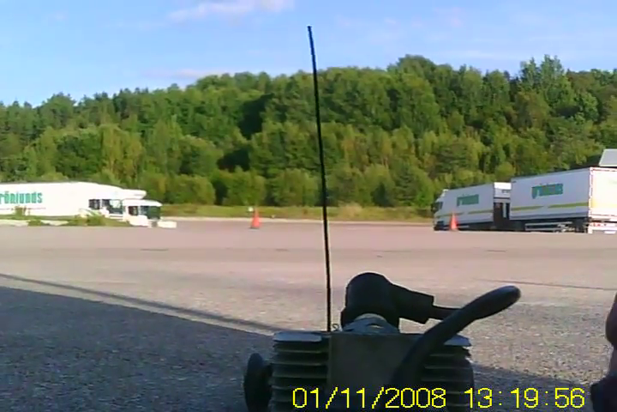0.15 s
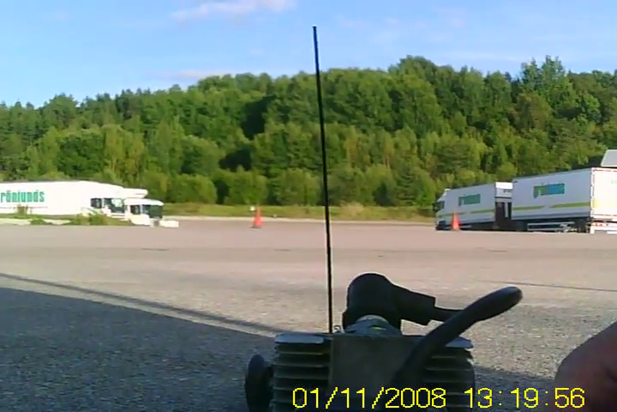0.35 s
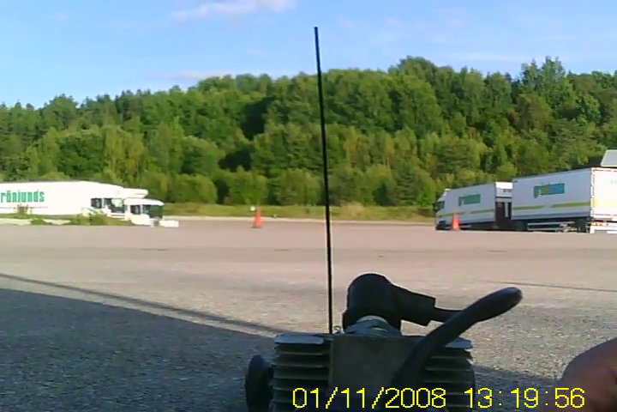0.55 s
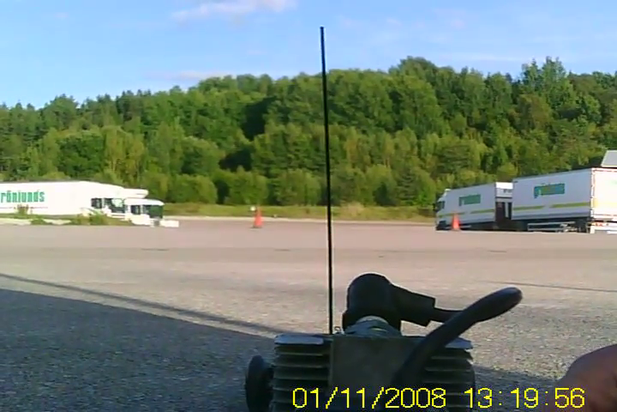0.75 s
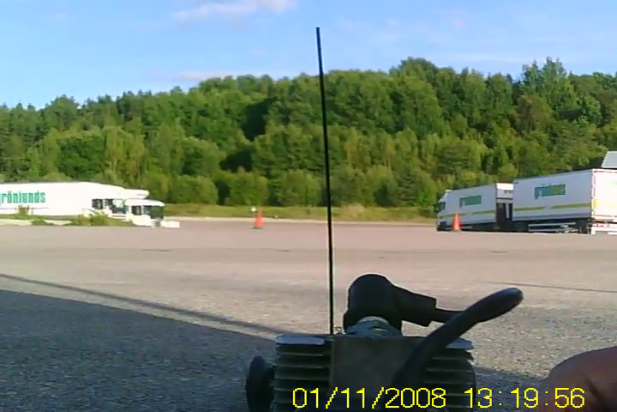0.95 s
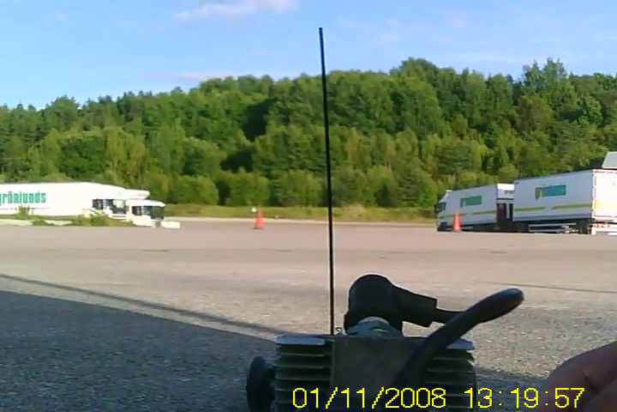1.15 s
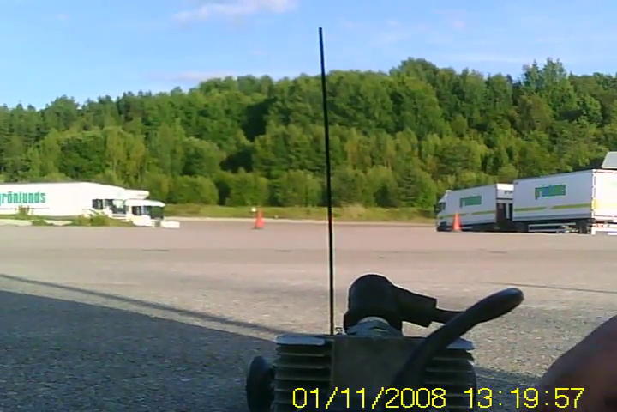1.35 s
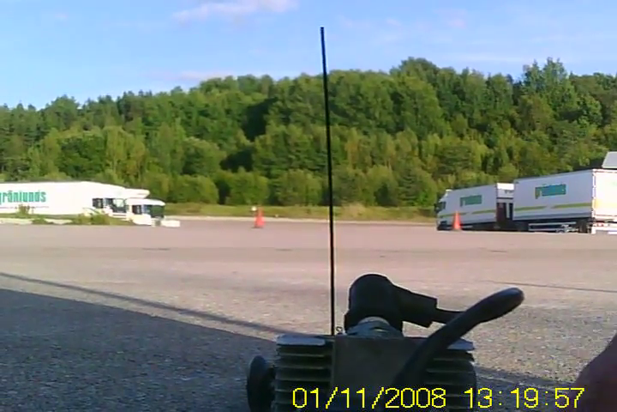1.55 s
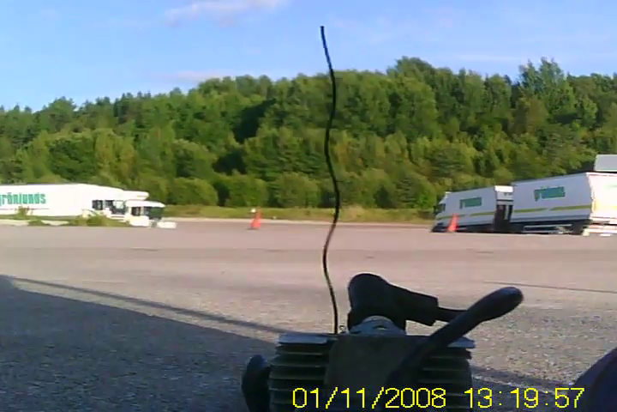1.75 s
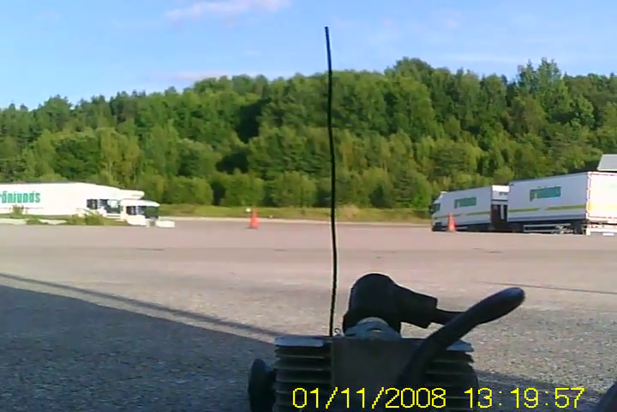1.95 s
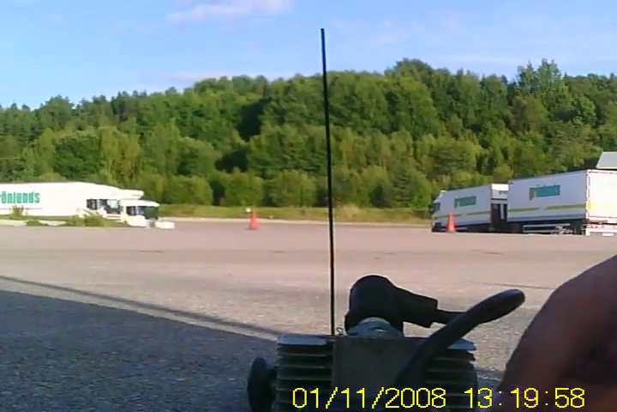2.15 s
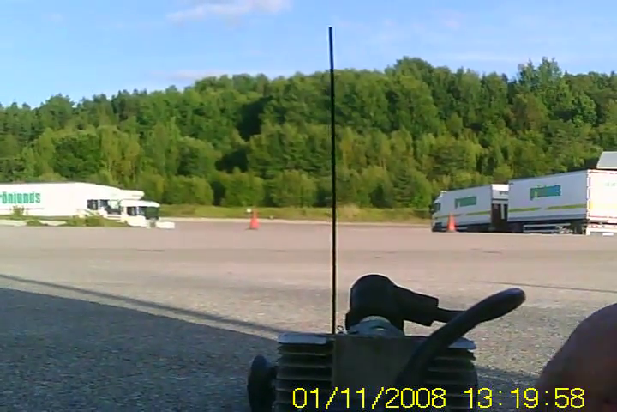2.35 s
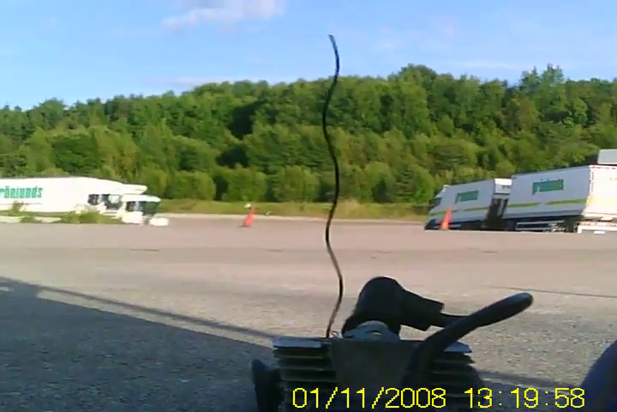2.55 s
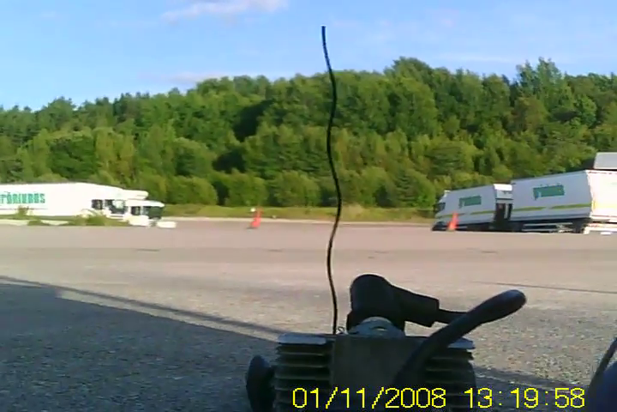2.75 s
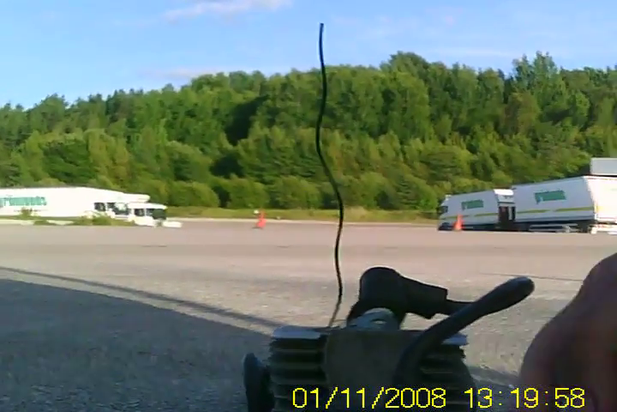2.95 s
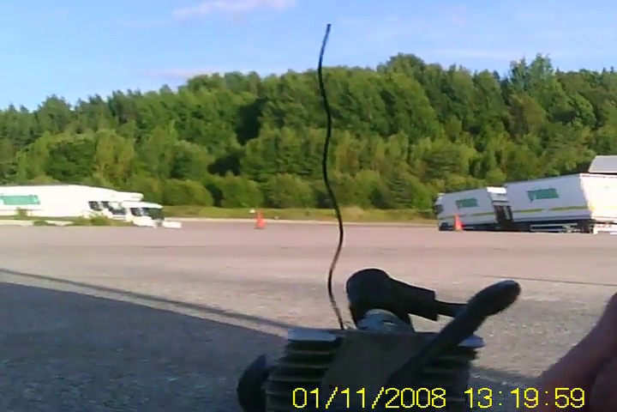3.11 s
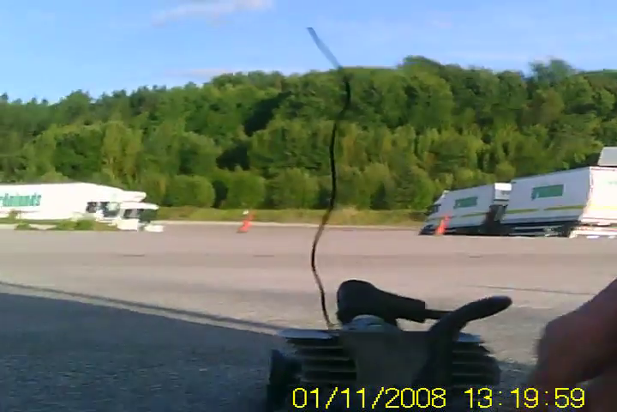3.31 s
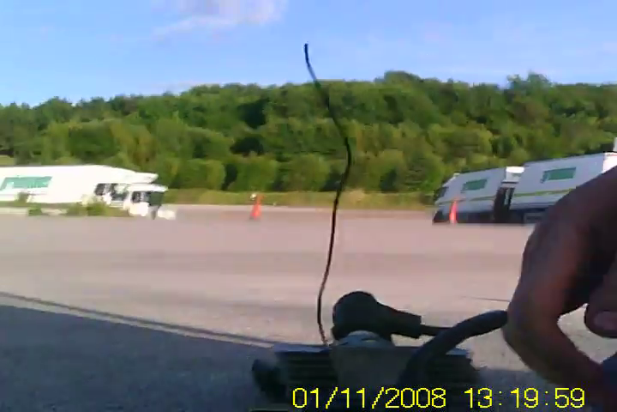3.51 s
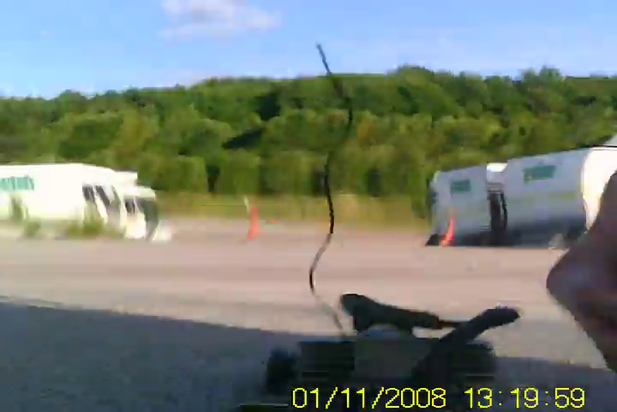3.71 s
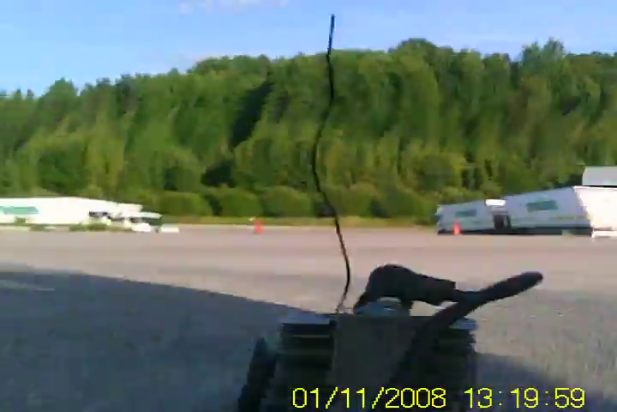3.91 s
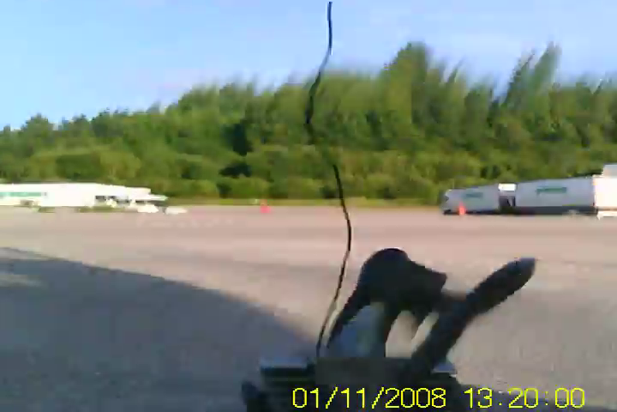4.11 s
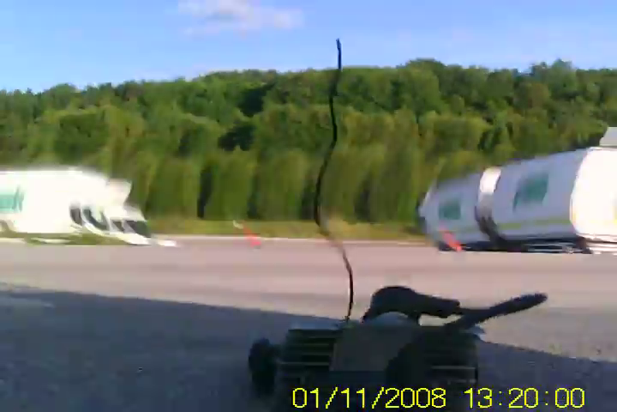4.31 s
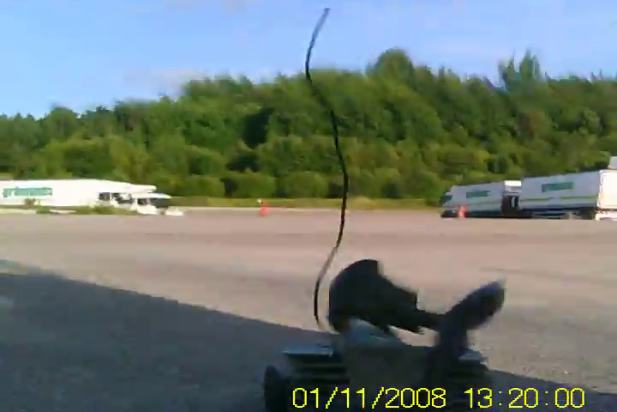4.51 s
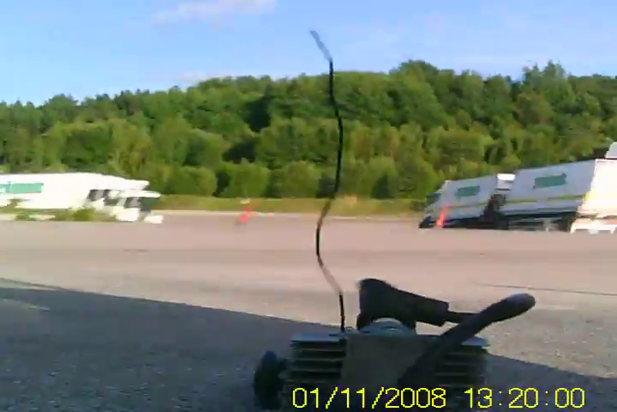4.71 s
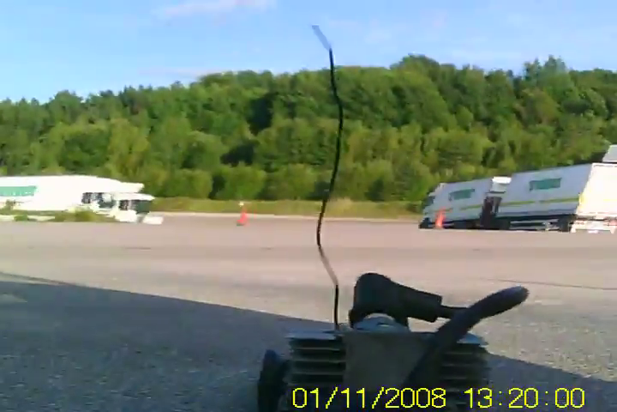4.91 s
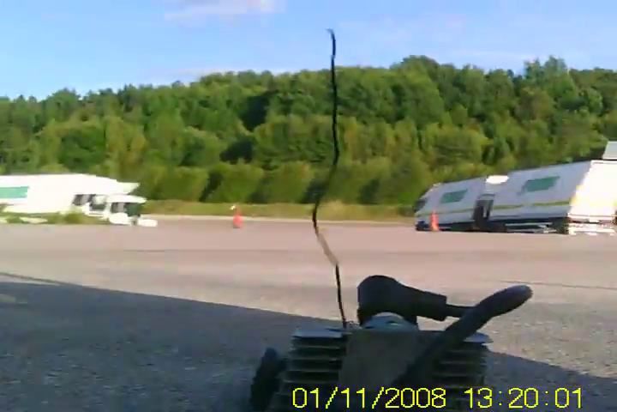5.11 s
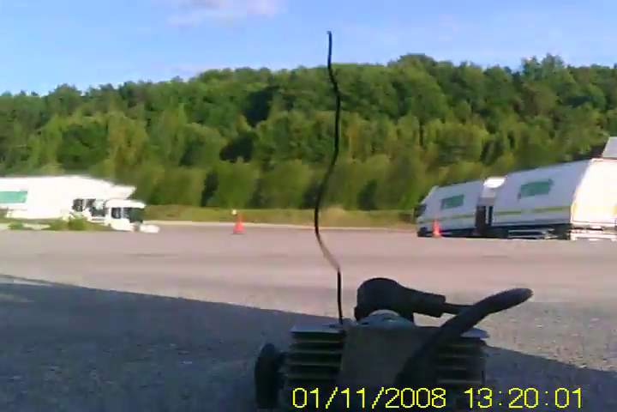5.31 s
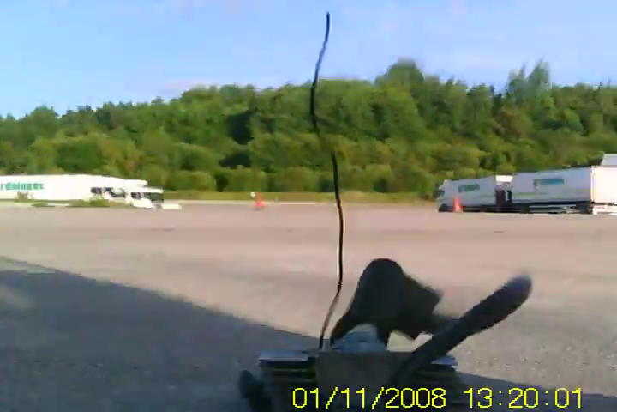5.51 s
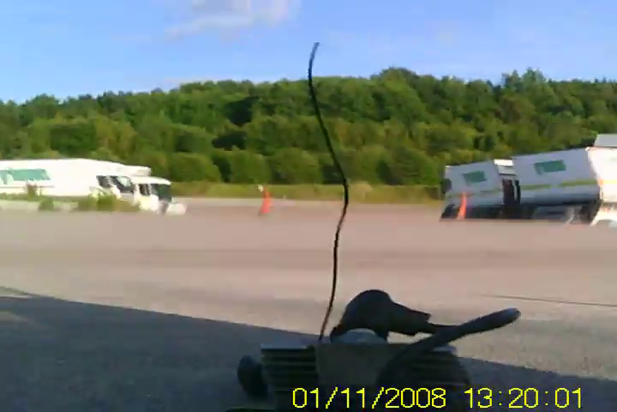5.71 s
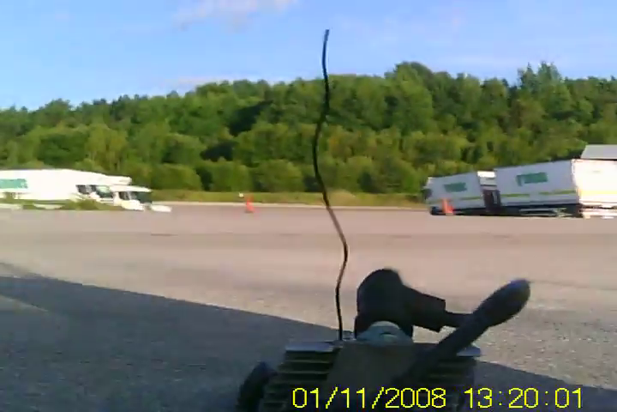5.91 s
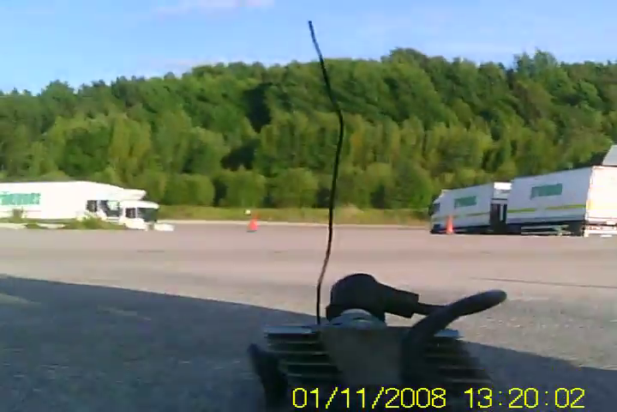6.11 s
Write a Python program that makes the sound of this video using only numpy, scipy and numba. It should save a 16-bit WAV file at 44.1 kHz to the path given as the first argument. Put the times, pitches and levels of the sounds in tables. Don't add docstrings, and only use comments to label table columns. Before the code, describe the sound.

Close beside a cheap overloaded microphone, a little model engine is pull-started outdoors, coughs into life and sputters on with metallic ticking.

```python
import sys
import numpy as np
from scipy import signal
from scipy.fft import rfft, irfft
from scipy.io import wavfile
from scipy.ndimage import uniform_filter1d
from numba import njit

SR = 44100
rng = np.random.default_rng(int(sys.argv[2]) if len(sys.argv) > 2 else 0)


def put_to_file(sound):
    columns = np.atleast_2d(sound).T
    safe = np.clip(columns, -1, 1)
    whole_steps = np.round(safe * 32767)
    wavfile.write(sys.argv[1], SR, whole_steps.astype(np.int16))


def voltage_ratio(level):
    return 10 ** (np.asarray(level, float) / 20)


N = 276066


@njit
def svf(x, hz, width):
    y, b, l = np.empty(len(x)), 0., 0.
    for i in range(len(x)):
        g, k = np.tan(np.pi * hz[i] / SR), width / hz[i]
        v = (b + g * (x[i] + 1e-18 - l)) / (1 + g * (g + k))
        b, l, y[i] = 2 * v - b, l + 2 * g * v, k * v
    return y


def band(x, hz, width):
    return svf(x, np.full(len(x), 1. * hz), 1. * width)


def body(x, modes, stretch=0.96):
    total = np.zeros(N)
    for hz, width, db in modes:
        click_gain = SR / 2 / np.pi / width
        total += voltage_ratio(db) * click_gain * svf(x, hz * stretch * np.ones(N), 1. * width)
    return total


def follow(table, s):
    return np.interp(s, *np.transpose(table))


def unit(x):
    return x / np.sqrt(np.mean(x ** 2))


def add(track, s, shape):
    part = track[int(s * SR):int(s * SR) + len(shape)]
    part += shape[:len(part)]


def push(length_s):
    shape = np.hanning(int(length_s * SR) + 3)
    return shape / shape.sum()


def burst(length_s, rise_s):
    t = np.arange(int(.12 * SR)) / SR
    fade = np.exp(-(t / max(length_s, .002)) ** 1.4)
    return rng.standard_normal(len(t)) * (1 - np.exp(-t / rise_s)) * fade


def stirred(ring, modes, pitch, gas_db):
    dull = signal.lfilter(*signal.butter(2, 1100., fs=SR), rng.standard_normal(N))
    loudness = uniform_filter1d(np.abs(ring), 1500)
    return ring + voltage_ratio(gas_db) * unit(body(dull, modes, pitch)) * loudness


def shaft(speed):
    t = np.arange(speed[0][0], speed[-1][0], 1 / SR)
    angle = np.cumsum(follow(speed, t)) / SR
    return np.interp(np.arange(int(angle[-1]) + 1), angle, t)


# (time [s], speed [turns/s])
PULLS = [
    [(.0558, 14), (.24, 8.5)],
    [(1.5982, 36.5), (1.64, 33.65), (1.7, 38.17), (1.78, 29.56), (1.86, 19.4), (1.96, 13.21), (2.17, 7.68)],
    [(2.4425, 27.88), (2.49, 40.39), (2.56, 37.4), (2.66, 28.18), (2.8, 26.75), (2.93, 31.31), (3.0, 35.32),
     (3.1, 37.46), (3.33, 52.13)],
]
FIRST_PUFF_DB = [-12.5, -14.5, -2.5]
# (time [s], peak level [dB], shove level [dB])
CATCH = [(2.6694, -16, -22), (2.744, -12, -17), (2.8553, -9.5, -31), (2.9547, -8.5, -34.5),
         (3.0395, -24, -50), (3.0676, -8, -57), (3.1445, -11.5, -28), (3.2127, -12, -13.5),
         (3.278, -12.5, -14.5), (3.3415, -12, -7.5), (3.3436, -15, -15), (3.3512, -17, -43)]


def puffs():
    puff_db, fast_turn_s, slow_db_per_s = -3, 0.0237, -340
    spent_db = -3.5
    rows, caught = [], np.transpose(CATCH)[0]
    for pull, first_db in zip(PULLS, FIRST_PUFF_DB):
        s = shaft(pull)
        gap = np.diff(s, prepend=s[0])
        db = puff_db + slow_db_per_s * np.maximum(gap - fast_turn_s, 0)
        db[0] = first_db
        since_firing = s - np.append(-N, caught)[np.searchsorted(caught, s)]
        after_catch_db = puff_db + spent_db * (since_firing > 1.5 * gap)
        db = np.where(s < caught[0], db, after_catch_db)
        unfired = np.abs(s[:, None] - caught).min(axis=1) > .012
        rows += list(zip(s[unfired], db[unfired]))
    return rows


IDLE_FROM_S = 3.37
# (time [s], speed [turns/s])
RUNNING = [(3.1576, 46.37), (3.3, 45.55), (3.5, 50.43), (3.8, 52.06), (4.0, 50.79), (4.2, 53.08),
           (4.6, 55.19), (5.0, 55.32), (5.15, 56.04), (5.35, 52.72), (5.6, 50.53), (5.85, 48.49),
           (6.05, 46.96), (6.26, 49.23)]
RHYTHM = [(5, 3), (1, 3), (5, 2), (5, 3), (2, 2), (1, 3), (2, 2), (1, 3), (3, 3), (2, 3), (7, 3), (4, 2),
          (8, 2), (2, 3), (2, 2), (1, 2), (3, 2), (2, 3), (2, 2), (2, 3)]
# (first peak level [dB], last peak level [dB], shove level [dB])
STRENGTH = [(-6, -10.5, -17), (-8, 3, -4.5), (-10, -18, -32), (-10, -5.5, -19.5), (-10, -13.5, -18.5),
            (-7, 0, -27), (-15, -14, -25), (-8.5, -4.5, -40), (-8.5, -7.5, -17), (-8.5, -13.5, -19),
            (-5, -8, -20.5), (-12.5, -9, -34), (-16, -6.5, -36), (-7, -3.5, -24), (-10.5, -10.5, -34),
            (-6, -8, -34), (-12.5, -7.5, -50), (-6, -5.5, -45), (-7, -17, -34), (-10, -10.5, -40)]


def turns():
    lag_s, lag_s_per_hz, lag_at_hz = .0015, .00078, 55.3
    shove_per_db, scatter_db = 1.5, 1.45
    tick_s = shaft(RUNNING)
    jitter_s = .0002 * rng.standard_normal(len(tick_s))
    port_s = tick_s + jitter_s + lag_s + lag_s_per_hz * (lag_at_hz - follow(RUNNING, tick_s))
    fired, turn = [], 11
    for (count, wait), (first_db, last_db, shove_db) in zip(RHYTHM, STRENGTH):
        middle_db = (first_db + last_db) / 2
        for db in np.linspace(first_db, last_db, count) + scatter_db * rng.standard_normal(count):
            fired.append((port_s[turn], db, shove_db + shove_per_db * (db - middle_db)))
            turn += wait
    return tick_s, port_s[tick_s > IDLE_FROM_S], fired


# (time [s], level [dB])
WHIRR_IDLE = [(3.37, -30.5), (4.5, -24.5), (5.3, -28), (5.6, -37), (6.26, -37.5)]
# (time [s], whirr level [dB], shake level [dB], width [s])
STRAINS = [
    (0.0, -22, -24, 0.011),
    (1.6, -45, -32.5, 0.11),
    (1.74, -34, -59, .03),
    (2.37, -72, -43, 0.04),
    (2.541, -12.5, -50, 0.044),
    (2.96, -25, -45, 0.1),
]


def stir():
    t = np.arange(N) / SR
    speed = sum(np.interp(t, *np.transpose(pull), 0, 0) for pull in PULLS) / 40
    speed = uniform_filter1d(speed, size=2000)
    idle = uniform_filter1d(1. * (t > IDLE_FROM_S), size=2000)
    whirr = voltage_ratio(-48.5) + voltage_ratio(-35.5) * np.abs(speed) ** 1.06 + idle * voltage_ratio(follow(WHIRR_IDLE, t))
    shake = voltage_ratio(-43) + idle * voltage_ratio(-45)
    for s, whirr_db, shake_db, width in STRAINS:
        bell = np.exp(-((t - s) / width) ** 2)
        whirr = whirr + voltage_ratio(whirr_db) * bell
        shake = shake + voltage_ratio(shake_db) * bell
    return whirr, shake


# (frequency [Hz], width [Hz], level [dB])
WHIRR = [(1930, 220, 0), (2650, 400, -6), (3800, 500, -6), (6450, 850, -1), (8300, 1500, -15)]
# (frequency [Hz], level per Hz [dB])
AIR = [(25, -64), (76, -52), (165, -5), (323, -17.5), (2200, -26), (5120, -40), (12000, -71), (16000, -95)]
# (frequency [Hz], rms level [dB])
WHINES = [(2896, -79), (3892, -78), (5599, -81), (7402, -83)]


def background(port_s):
    whirr_gain, shake_gain = stir()
    gate = np.ones(N)
    for s in port_s:
        add(gate, s, 8.0 * np.exp(-np.arange(800) / SR / 0.0025))
    whirr = gate * unit(body(rng.standard_normal(N), WHIRR)) * whirr_gain * voltage_ratio(-16.5)
    deep = band(band(rng.standard_normal(N), 42, 60), 42, 60)
    shake = unit(deep) * shake_gain * voltage_ratio(-8.5)
    hz, db = np.transpose(AIR)
    bins_hz = np.arange(1, N // 2 + 2) * SR / N
    colour = voltage_ratio(np.interp(np.log(bins_hz), np.log(hz), db))
    air = unit(irfft(rfft(rng.standard_normal(N)) * colour, N)) * voltage_ratio(-57.5)
    whines = sum(voltage_ratio(db) * unit(band(rng.standard_normal(N), hz, 25)) for hz, db in WHINES)
    return whirr + shake + whines + air


# (time [s], peak level [dB], centre [Hz], rattle length [s])
RATTLES = [(0.0024, -36, 2370, 0.022), (0.037, -32, 2150, 0.013), (0.1624, -30, 3770, 0.0053),
           (0.171, -40, 1750, 0.011), (0.296, -45, 1710, 0.012), (0.299, -46, 700, 0.016),
           (2.367, -27, 700, 0.019), (0.369, -51, 1900, 0.013), (0.6997, -33, 3130, 0.012),
           (0.8868, -26.5, 2770, 0.013), (1.288, -44, 3000, 0.021), (1.532, -42, 1930, 0.011),
           (1.564, -9.5, 2550, 0.014), (1.566, -18, 1100, 0.012), (2.145, -52, 2360, 0.012),
           (2.191, -47, 1980, 0.0065), (2.282, -49, 3000, .015), (2.358, -50, 1730, 0.031),
           (2.381, -13.5, 1815, 0.016)]
# (time [s], peak level [dB], length [s])
LEAKS = [(1.852, -20, .008), (1.874, -21, .01), (2.422, -18, .01), (2.447, -16, .008), (2.753, -12, .008),
         (2.8245, -15, .008), (2.844, -14, .008), (2.868, -8, .008), (2.89, -16, .008), (2.911, -17, .008),
         (2.933, -12, .01), (2.972, -7, .008), (2.995, -11, .012), (3.254, -13, .008), (3.296, -12, .008),
         (3.318, -13, .008)]
# (frequency [Hz], width [Hz], level [dB])
FRAME = [(2050, 160, -1), (2750, 90, -5), (3150, 170, 0), (3900, 200, -3), (6150, 420, 3)]


def starter():
    knocks, leak, frame = np.zeros((3, N))
    for s, db, hz, length in RATTLES:
        rattle = burst(length, .001)
        rattle[:3] += 1.5
        add(frame, s, voltage_ratio(db) * rattle)
        add(knocks, s, voltage_ratio(db) * 2.4 * band(band(rattle, hz, 1500), hz, 1500))
    for s, db, length in LEAKS:
        add(leak, s, voltage_ratio(db) * burst(length, 0.000072))
    hiss = body(leak, [(6150, 880, 9.5), (7950, 20000, -13)])
    return knocks + voltage_ratio(-25) * body(frame, FRAME) + voltage_ratio(-24.0) * hiss


# (time [s], tick peak level [dB])
LOOSE = [(3.158, -4), (3.2, 0.5), (3.245, 2.5), (3.335, 4.5), (3.375, -1.2), (3.67, -7), (3.85, -6.5),
         (3.965, -20), (4.14, -3), (4.25, -6.5), (4.385, -22.5), (4.48, -2.5), (4.6, -6), (5.0, -10.5),
         (5.45, -12), (5.56, -14.5), (5.84, -0.5), (6.26, -4.5)]
# (from [s], to [s], first peak level [dB], last peak level [dB])
SPELLS = [
    (1.644, 1.815, 1, -16),
    (2.457, 2.589, -1, 1.8),
    (2.627, 2.79, -11, -10),
]
# (time [s], peak level [dB])
STRAY_TICKS = [(1.728, -3), (2.595, -6), (3.0036, -3.5), (3.0509, -9), (3.1213, -14)]
# (frequency [Hz], width [Hz], level [dB])
METAL = [(2540, 450, 1.5), (3780, 550, -5), (4750, 500, -15), (6420, 800, -1), (8600, 1300, -18)]


def ticks(tick_s):
    rows = list(STRAY_TICKS)
    for start, end, first_db, last_db in SPELLS:
        for s, _ in puffs():
            if start < s < end:
                rows.append((s + 0.0071, np.interp(s, [start, end], [first_db, last_db])))
    rows += [(s + .0013, follow(LOOSE, s)) for s in tick_s]
    hits = np.zeros(N)
    for s, db in rows:
        scatter, second = rng.standard_normal(2)
        size = voltage_ratio(db - 6.5 + 1.8 * scatter)
        add(hits, s, -size * push(.00004))
        add(hits, s + .00045 + .000015 * second, .9 * size * push(.00004))
        add(hits, s, voltage_ratio(-32) * size * burst(.0035, .0008))
    ring = signal.sosfilt(signal.butter(2, 8200., fs=SR, output="sos"), body(hits, METAL))
    return ring - band(ring, 700, 800)


# (time [s], level [dB])
HARD_PUFFS = [
    (.004, -27),
    (1.626, -3),
    (1.6555, -4),
]
# (time [s], pitch factor [1])
COLD_PITCH = [(0, 1.08), (2.4, 1.058), (2.9, 1.11), (3.4, 1.07), (6.26, 0.33)]
# (frequency [Hz], width [Hz], level [dB])
COLD_PIPE = [(196.7, 54, 2.5), (228.6, 5.9, -11.5), (442.2, 25.4, -3.5), (666, 41, -8), (880.3, 23.7, -9),
             (1168, 27, -18)]


def pulled():
    ring_share, thump_share = 0.9, 1.25
    drive, direct, gusts, case = np.zeros((4, N))
    for s, db in puffs() + HARD_PUFFS:
        length = 0.0012 * voltage_ratio(-.2 * (db + 4.5))
        slow = voltage_ratio(-.5 * min(db + 3, 0))
        add(drive, s - 0.24 * length, -voltage_ratio(ring_share * db - 8.0) * push(0.39 * length * slow))
        add(case, s - 0.42 * length, -voltage_ratio(db - 17.5) * (slow - 1) * push(length))
        rush_in = np.hanning(int(length * SR)) ** .5
        throw_out = np.hanning(int(1.6 * length * SR)) ** .4
        add(direct, s - .55 * length, -voltage_ratio(thump_share * db - 1.8) * rush_in)
        add(direct, s + .35 * length, voltage_ratio(thump_share * db - 4.8) * throw_out)
        add(gusts, s, voltage_ratio(db) * burst(0.027, 0.00015))
    for s, db, _ in CATCH:
        add(drive, s + .002, voltage_ratio(db + 4.0) * push(0.00043))
    slow_noise = uniform_filter1d(uniform_filter1d(rng.standard_normal(N), size=500), size=500)
    pitch = follow(COLD_PITCH, np.arange(N) / SR) * (1 + .025 * unit(slow_noise))
    pipe = stirred(body(drive, COLD_PIPE, pitch), COLD_PIPE[1:], pitch, -4.5)
    return pipe + direct + body(case, [(175, 23, 10)]) + voltage_ratio(-40.0) * body(gusts, WHIRR)


# (time [s], level [dB])
IDLE_PUFF = [(3.4, -20.5), (4.3, -18.5), (5.1, -19), (6.2, -17)]
# (frequency [Hz], width [Hz], level [dB])
PIPE = [(250, 98, 4.5), (427.6, 40, -10.5), (526, 81, 2), (825, 82, -4.5), (1003, 112, 3.5),
        (1350, 990, -84)]


def exhaust(port_s, fired):
    drive = np.zeros(N)
    for s, turn in zip(port_s, np.gradient(port_s)):
        size = voltage_ratio(follow(IDLE_PUFF, s) + 2.2 * rng.standard_normal())
        add(drive, s + 0.0014, -size * push(0.0013))
        add(drive, s + 0.321 * turn, voltage_ratio(-18.5) * size * push(0.00033))
        add(drive, s + 0.71 * turn, -voltage_ratio(-8.0) * size * push(0.001))
    for s, db, _ in fired:
        add(drive, s + 0.001105, voltage_ratio(db - 8.0) * push(0.0008))
    return stirred(body(drive, PIPE), PIPE, 1., -12)


# (time [s], level [dB])
CRACK = [(3.4, 0.4), (5.1, -0.8), (5.75, -6), (6.26, -6)]
# (frequency [Hz], width [Hz], level [dB])
MOUTH = [(2148, 686, 5.5), (1242, 140, -0.5), (580, 130, -25)]
# (frequency [Hz], width [Hz], level [dB])
HISS = [(3800, 700, -4), (6250, 800, 0), (8500, 1500, -3)]


def firings(fired):
    crack, hiss, roar, shove, after = np.zeros((5, N))
    t = np.arange(int(.06 * SR)) / SR
    shove_shape = (1 - np.exp(-t / .0015)) * np.exp(-t / 0.039)
    for s, db, shove_db in CATCH + fired:
        crack_s = 0.00045 * voltage_ratio(2.7 * rng.standard_normal())
        add(crack, s + 0.00011, -voltage_ratio(db + follow(CRACK, s)) * push(crack_s))
        add(hiss, s + .0012, voltage_ratio(db) * burst(.004, .0004))
        add(shove, s + 0.00159, -voltage_ratio(shove_db + 4.0) * shove_shape)
    for s, db, _ in CATCH:
        add(roar, s + .001, voltage_ratio(db + 23) * burst(.004, .0003))
        add(after, s + 0.009, voltage_ratio(db + 3.0) * burst(0.015, .002))
    swelling = voltage_ratio(14.5) * band(band(body(crack, MOUTH), 1850, 750), 1850, 900)
    burning = band(roar, 1332, 1667) + band(after, 1813, 690)
    return swelling + burning + voltage_ratio(-30.0) * body(hiss, HISS) + shove


def scene():
    tick_s, port_s, fired = turns()
    around = background(port_s) + starter() + ticks(tick_s)
    engine = pulled() + exhaust(port_s, fired) + firings(fired)
    return (around + engine)[None]


def band_limit(x):
    return signal.sosfilt(signal.butter(12, 16990, fs=SR, output="sos"), x)


def record(dry):
    ceiling, full_scale = .82, .76
    x = signal.sosfilt(signal.butter(1, 14., "high", fs=SR, output="sos"), dry)
    x = ceiling * np.tanh(x / ceiling)
    x = signal.sosfilt(signal.cheby1(5, .5, 10000, fs=SR, output="sos"), x)
    x = (x + full_scale) % (2 * full_scale) - full_scale
    x = signal.sosfilt(signal.ellip(3, .5, 20, 10300, fs=SR, output="sos"), x)
    return band_limit(x)


dry = scene()
out = record(dry)
put_to_file(out)
```